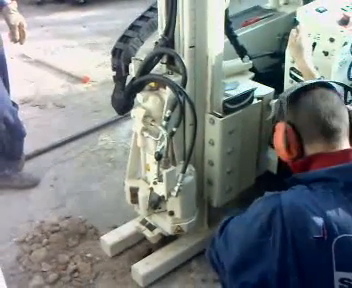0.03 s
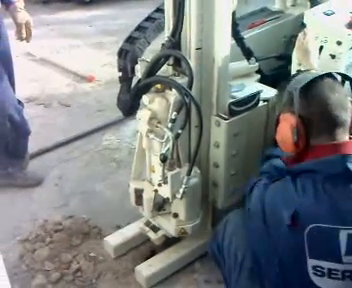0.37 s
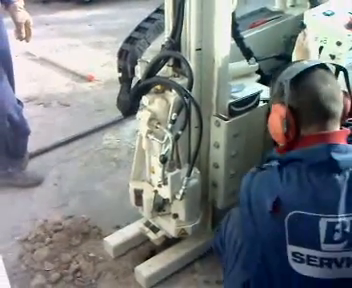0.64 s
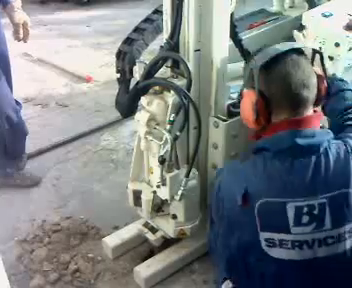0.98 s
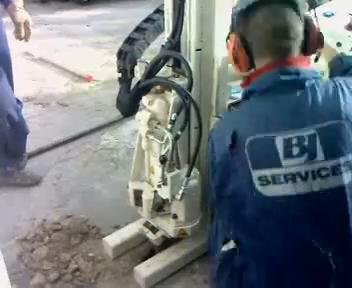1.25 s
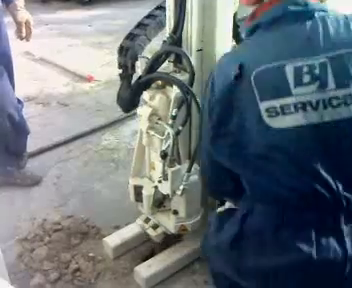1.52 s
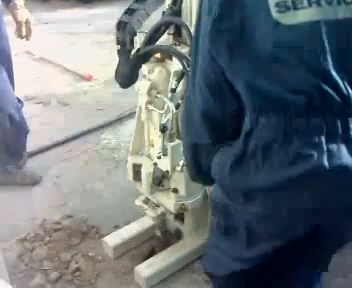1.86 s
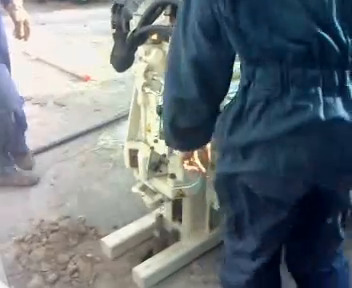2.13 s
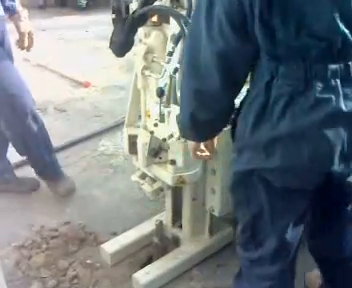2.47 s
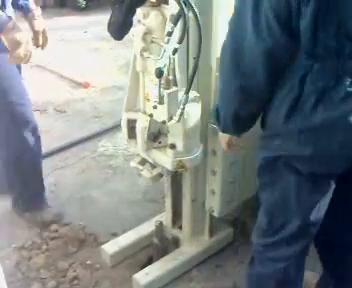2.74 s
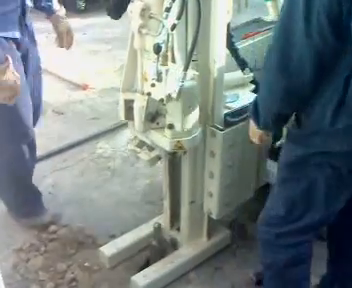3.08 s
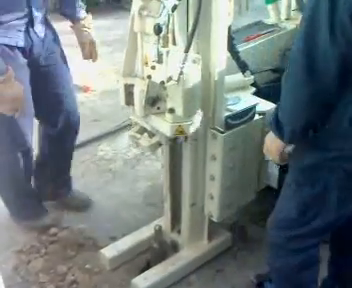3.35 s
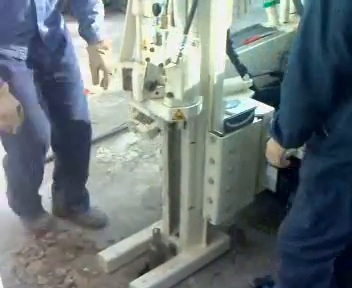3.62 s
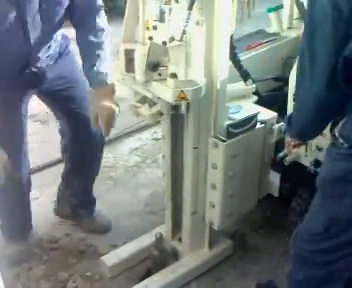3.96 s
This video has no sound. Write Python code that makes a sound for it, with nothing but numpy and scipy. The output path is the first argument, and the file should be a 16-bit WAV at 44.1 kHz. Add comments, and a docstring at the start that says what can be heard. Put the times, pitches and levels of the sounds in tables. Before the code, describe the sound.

A hydraulic hammer pounds a steel rod from the start, about 24 loud, clanging blows a second, close by outdoors. It slows around 1.5 seconds and stops near 1.8 after three late blows. A faint scrape and a few light metal taps follow until about 2.1. An engine drones underneath throughout, with pump whine and softly rushing oil, carrying on alone and slightly faster until 4 seconds.

```python
"""A hydraulic hammer on a small drill rig drives a steel probe rod into the ground, about 24 blows a second,
slowing slightly and stopping after three late blows. Each blow cracks, clangs in the rod and shakes the
mast; then the hammer scrapes off and the loose rod taps its guide. Behind it the three-cylinder engine
drones on with pump whine and rushing oil, a little faster once the load is off.
Outdoors in a yard, close to the rig, on a small camera that squashes the peaks."""
import sys
import numpy as np
from scipy import signal
from scipy.fft import rfft, irfft, next_fast_len
from scipy.io import wavfile
from scipy.ndimage import uniform_filter1d, map_coordinates

SR = 44100
rng = np.random.default_rng(int(sys.argv[2]) if len(sys.argv) > 2 else 0)


def to_wav(sig):
    """Store sig (one row per channel, or 1-D mono) as 16-bit WAV at the path in sys.argv[1].

    Samples outside -1..1 are clipped; the rate is SR.
    """
    pcm = np.clip(np.atleast_2d(sig), -1, 1) * 32767
    pcm = np.round(pcm).astype(np.int16)
    wavfile.write(sys.argv[1], SR, pcm.T)  # frames by channels


N = 176400

# The hammer's blows. Each row: start in seconds, then relative levels in dB of the clang,
# of the mast and crack, and of the rod's ring.
BLOWS = [(0.0004, -10, -13.5, -20), (0.0329, -11, -11.5, -21.5), (0.0744, -7, -12, -22),
         (0.1149, -9, -11, -10), (0.155, -4.5, -12.5, -22), (0.195, -8.5, -12.5, -20.5),
         (0.2358, -4.5, -17, -20.5), (0.2749, -5.5, -15, -11), (0.3169, -6, -14, -28),
         (0.3583, -2, -14.5, -14.5), (0.3953, -8, -13, -21), (0.4391, -5.5, -15, -12.5),
         (0.4799, -3, -13, -20.5), (0.5211, -2.5, -12, -20.5), (0.5608, -4, -12.5, -21),
         (0.6017, 0, -13.5, -28), (0.6425, -4, -13, -21), (0.6848, -2, -12.5, -5.5),
         (0.7255, -2.5, -13.5, -17), (0.7667, -5, -11.5, -23), (0.8072, -3, -12, -20),
         (0.85, -2.5, -13, -24), (0.892, -3, -13, -13), (0.9321, -0.5, -13, -15), (0.9737, -1.5, -11.5, -5),
         (1.0171, -3.5, -12, -22), (1.058, -0.5, -13, -14.5), (1.1017, -1.5, -10.5, -22),
         (1.1438, -4.5, -11, -18), (1.1865, 0.5, -13, -5.5), (1.2294, -0.5, -9.5, -23.5),
         (1.273, -3, -12, -5.5), (1.3172, -0.5, -10.5, -7), (1.361, -2, -11, -6),
         (1.4059, -3.5, -12, -17.5), (1.4496, 0, -12.5, -6), (1.496, 1, -13.5, -16.5),
         (1.5604, -4.5, -13.5, -14.5), (1.6474, -3, -17, -19), (1.7486, -6.5, -15, -9)]
# Modes of the steel rod. Each row: pitch in Hz, relative level in dB, seconds to fall 60 dB.
ROD_MODES = [(2080, -11, .05), (4300, -7, .04), (4400, -7, .035), (5340, -2, .03), (5535, 0, .03),
             (5740, -11, .03), (6400, -16, .03)]
# Spectrum of steel on steel at the rod head. Each row: frequency in Hz, relative level in dB.
CONTACT_SPECTRUM = [(300, -24.5), (1000, -18), (1600, 1), (2100, 6), (2700, -10), (3700, -8.5),
                    (4400, -5.5), (5200, -11), (7500, -16.5)]


def amp(db):
    """Decibels to gain."""
    return 10 ** (np.asarray(db) / 20)


def unit(x):
    """Scaled to rms 1."""
    return x / np.sqrt(np.mean(x ** 2) + 1e-20)


def curve(rows):
    """(s, value) points as one value per sample."""
    return np.interp(np.arange(N) / SR, *np.transpose(rows))


def wobble(rate):
    """A smooth random curve, rate knots a second."""
    return map_coordinates(rng.standard_normal(int(N * rate / SR) + 4), [np.arange(N) * rate / SR])


def rise(t, attack_s):
    """An onset that climbs from 0 towards 1."""
    return 1 - np.exp(-t / attack_s)


def fade(t, t60, hold_s=0):
    """Full level for hold_s, then down 60 dB every t60 seconds."""
    return amp(-60 * np.maximum(t - hold_s, 0) / t60)


def swell(t, at_s, width_s):
    """A bell curve that peaks at at_s."""
    return np.exp(-.5 * ((t - at_s) / width_s) ** 2)


def coloured(x, points):
    """x through a spectrum of (Hz, dB) points on a log axis."""
    n = x.shape[-1]
    size = next_fast_len(n + 2048)
    hz, db = np.transpose(sorted(map(tuple, points)))
    gain = amp(np.interp(np.log(np.fft.rfftfreq(size, 1 / SR) + 1), np.log(hz + 1), db))
    return irfft(rfft(x, size) * gain, size)[..., :n]


def band(hz, width):
    """Spectrum of one broad resonance, 30 dB down a factor of 1 + width either side of hz."""
    skirt = [(1 + width / 4, 0), (1 + width, -30), (1 + 3 * width, -70)]
    return [(hz / ratio, db) for ratio, db in skirt] + [(hz * ratio, db) for ratio, db in skirt]


def blend(a, b, share):
    """Two unrelated signals mixed by power, share of it from a."""
    return np.sqrt(share) * a + np.sqrt(1 - share) * b


def valve():
    """Oil rushes through a valve in uneven surges."""
    # The narrow band of the rush. Each row: frequency in Hz, relative level in dB.
    rush_spectrum = [(1200, -40.5), (1480, -9.5), (1600, 3), (1670, -0.5), (1760, -15.5), (2000, -41.5)]
    surges = amp(1.5 * wobble(rate=22))
    return amp(-41) * unit(surges * coloured(rng.standard_normal(N), rush_spectrum))


def cyclic_noise(cycles, cycle_hz, spectrum):
    """Machine noise: half its power repeats with every engine cycle, half is fresh."""
    size = int(SR / cycle_hz.mean())
    position = (cycles % 1 * size).astype(int) % size
    repeated = rng.standard_normal(size)[position]
    return unit(coloured(blend(repeated, rng.standard_normal(N), share=.5), spectrum))


def clatter(cycles, cycle_hz):
    """The engine's gears and valves clatter round with each cycle."""
    # Colour of the clatter. Each row: frequency in Hz, relative level in dB.
    spectrum = [(30, -17.5), (60, -2), (120, 7.5), (260, 5), (400, 2), (600, -2), (900, -2.5), (1200, -2.5),
                (1450, 0), (1800, -1.5), (2050, -2.5), (2250, -9.5), (2650, -4.5), (3200, -4), (3500, -8),
                (4200, -11), (4700, -9), (5200, -14), (6000, -13.5), (7200, -18.5), (7700, -29),
                (8300, -49.5)]
    # Its loudness. Each row: time in seconds, level in dB.
    levels = [(0, -29), (1.9, -31.5), (2.5, -33), (3.2, -33), (4, -32.5)]
    return amp(curve(levels)) * cyclic_noise(cycles, cycle_hz, spectrum)


def knock(cycles, cycle_hz):
    """Combustion knocks in three cylinders in turn, each with its own strength."""
    # Colour of the knock. Each row: frequency in Hz, relative level in dB.
    spectrum = [(300, -24), (600, -9), (870, 0), (1030, -1), (1200, -16), (3000, -26)]
    cylinders, cylinder_db = 3, np.array([-7, 0, -10])
    firings = cycles * cylinders
    since_firing_s = firings % 1 / (cycle_hz * cylinders)
    strength = amp(cylinder_db[np.floor(firings).astype(int) % cylinders])
    pulses = uniform_filter1d(strength * fade(since_firing_s, t60=.024), size=60)
    return amp(-39.5) * unit(pulses * cyclic_noise(cycles, cycle_hz, spectrum))


def drone(cycles):
    """Exhaust puffs, pump whine and fan, all tied to the crankshaft."""
    # Exhaust, block and main pump tones. Each row: multiple of the cycle rate, relative level in dB.
    engine_tones = [(2, -48.5), (3, -21), (6, -19), (9, -24), (12, -29.5), (20, -31), (22, -51), (32, -52),
                    (34, -44.5), (38, -56), (39, -48.5)]
    # The pump's upper whine. Each row: multiple of the cycle rate, relative level in dB.
    pump_tones = [(40, -40.5), (80, -49.5), (98, -54), (102, -55), (110, -57), (127, -55)]
    # Swell of the engine tones and fan. Each row: time in seconds, gain in dB.
    engine_swell = [(0, -0.5), (.6, -1), (1.2, -0.5), (1.65, -1), (1.87, 0.5), (2.2, .5), (3, 0.5),
                    (4, -0.1)]
    # Swell of the upper whine. Each row: time in seconds, gain in dB.
    pump_swell = [(0, -3.5), (2.3, -5.5), (2.75, -1), (3.1, 2.5), (3.6, 3), (4, 4.5)]
    fan_order, fan_db, waver_db = 8.67, -35.5, .4

    def tones(rows):
        return sum(-amp(db + waver_db * wobble(rate=12)) * np.cos(2 * np.pi * round(order) * cycles)
                   for order, db in rows)

    fan = amp(fan_db) * np.sin(2 * np.pi * fan_order * cycles)
    engine = amp(curve(engine_swell)) * (tones(engine_tones) + fan)
    pump = amp(curve(pump_swell)) * tones(pump_tones)
    return np.sqrt(2) * (engine + pump)


def scrape():
    """A short scrape of steel as the hammer slides off the rod head."""
    slide = swell(np.arange(N) / SR, at_s=1.88, width_s=.025)
    return amp(-37) * slide * unit(coloured(rng.standard_normal(N), CONTACT_SPECTRUM))


def taps():
    """The loosened rod taps its guide, lightly ringing its modes."""
    # The contacts. Each row: start in seconds, gain in dB.
    contacts = [(1.828, -40), (1.895, -33), (1.912, -39), (2.098, -41)]
    out, t = np.zeros(N), np.arange(SR // 8) / SR
    for start, tap_db in contacts:
        ring = sum(amp(db) * fade(t, t60) * np.sin(2 * np.pi * (hz * t + rng.random()))
                   for hz, db, t60 in ROD_MODES)
        out[round(start * SR):][:len(t)] += amp(tap_db) * rise(t, attack_s=.002) * ring
    return out


def mode(t, hz, db, t60, hold_s=0):
    """One struck mode, one row per blow, a little different in level and pitch each time."""
    scatter, detune = rng.standard_normal((len(BLOWS), 2)).T[:, :, None]
    tone = np.sin(2 * np.pi * hz * (1 + .003 * detune) * t)
    return amp(db + 1.5 * scatter) * fade(t, t60, hold_s) * tone


def dense_modes(t, spectrum):
    """Crowded steel modes, one row per blow: a pattern that drifts as the rod sinks, plus fresh rattle."""
    pattern, rows = rng.standard_normal(len(t)), []
    for drift, fresh in rng.standard_normal((len(BLOWS), 2, len(t))):
        pattern = blend(pattern, drift, share=.96)
        rows.append(blend(pattern, fresh, share=.68))
    return unit(coloured(np.array(rows), spectrum))


def mast_shake(t, starts):
    """Each blow rattles and rings the mast and clanks the frame; the rattle echoes round the yard."""
    # The rattle's low and upper range. Each row: frequency in Hz, relative level in dB.
    low_spectrum = [(60, -29.5), (190, -14), (255, 3), (330, -10), (420, -11)]
    upper_spectrum = [(520, -6.5), (620, -5), (750, -4), (950, -6.5), (1200, -4), (1600, -0.5), (2050, -5),
                      (2900, -9), (3500, -6), (4080, -9), (4450, -7.5), (5400, -7), (6000, -11),
                      (7300, -15), (8500, -16.5), (10000, -38)]
    # Mast modes, each loudest as the carriage passes its spot.
    # Each row: pitch in Hz, relative level in dB, seconds to fall 60 dB, loudest moment in seconds.
    mast_modes = [(255, -7, .2, .0), (748, -7, .13, .4), (1064, -10, .13, 1.05), (1210, -6, .13, .85),
                  (1355, -6, .13, .75), (1530, -6, .13, .3), (1575, -6, .13, 1.4), (1745, -8, .12, 1.3),
                  (2085, -5, .09, 1.2), (2330, -8, .08, .7), (3530, -11, .08, 1.2), (4340, -1, .07, .75),
                  (4420, 0, .06, .45)]
    # Hollow clanks that come and go as the rod sinks.
    # Each row: centre in Hz, relative level in dB, loudest moment and spread around it in seconds.
    frame_clanks = [(770, -5, .53, 0.051), (1260, -3, 0.78, .22), (2185, -2, 0.61, 0.2),
                    (2020, -4.5, 1.7, 0.077)]
    direct = amp(1) * fade(t, t60=.14)
    yard_echo = amp(-9.5) * fade(t, t60=.55)
    rattle = np.hypot(direct, yard_echo) * dense_modes(t, list(low_spectrum) + list(upper_spectrum))
    body = amp(-3) * sum(swell(starts, at_s, width_s=.4) * mode(t, hz, db, t60)
                         for hz, db, t60, at_s in mast_modes)
    clanks = sum(swell(starts, at_s, width_s) * amp(db) * dense_modes(t, band(hz, width=.3))
                 for hz, db, at_s, width_s in frame_clanks)
    return rise(t, attack_s=.0026) * (rattle + body + fade(t, t60=.13) * clanks)


def rod_ring(t):
    """The struck rod's modes sound briefly and leave a faint after-ring."""
    ring = sum(mode(t, hz, db, t60, hold_s=.007) + mode(t, hz, db - 24, t60=.4)
               for hz, db, t60 in ROD_MODES)
    return amp(-4) * rise(t, attack_s=.003) * ring


def rod_clang(t):
    """A bright clang, held while the rod chatters."""
    # Colour of the clang. Each row: frequency in Hz, relative level in dB.
    spectrum = [(300, -35), (700, -9.5), (1500, -9), (2300, -4.5), (2800, -8.5), (3500, -3.5), (4050, -4.5),
                (4380, 0.5), (4750, -0.5), (5150, 2), (5500, 4.5), (6000, -6.5), (7000, -11), (7700, -16)]
    envelope = rise(t, attack_s=.00037) * fade(t, t60=.024, hold_s=.006)
    return amp(-7.5) * envelope * dense_modes(t, spectrum)


def piston_crack(t):
    """The piston lands with a crack, one half-sine burst long."""
    crack_s = .0024
    burst = np.sin(np.pi * np.minimum(t / crack_s, 1))
    return amp(6.5) * burst * dense_modes(t, CONTACT_SPECTRUM)


def hammer():
    """The run of blows: each cracks, clangs, shakes the mast and rings the rod."""
    t = np.arange(int(.36 * SR)) / SR
    starts, clang_db, mast_db, ring_db = np.transpose(BLOWS)[:, :, None]
    crack = amp(mast_db) * piston_crack(t)
    clang = amp(clang_db) * rod_clang(t)
    mast = amp(mast_db) * mast_shake(t, starts)
    ring = amp(ring_db) * rod_ring(t)
    out = np.zeros(N + len(t))
    for start, blow in zip(starts[:, 0], crack + clang + mast + ring):
        out[round(start * SR):][:len(t)] += blow
    return out[:N]


def scene():
    """Engine and hammer at one spot close to the microphone, in mono."""
    # The pump's main whine, which gives the engine speed. Each row: time in seconds, pitch in Hz.
    whine_pitch = [(0.0, 503.3), (1.38, 502.4), (1.59, 513.4), (1.75, 505.6), (2.16, 510.6), (4.0, 508.5)]
    whine_order, speed_waver, first_firing_s = 20, .0012, .0105
    cycle_hz = curve(whine_pitch) / whine_order * (1 + speed_waver * wobble(rate=14))
    cycles = np.cumsum(cycle_hz) / SR - first_firing_s * cycle_hz[0]
    engine = drone(cycles) + clatter(cycles, cycle_hz) + knock(cycles, cycle_hz)
    return (engine + valve() + hammer() + scrape() + taps())[None]


def record(dry):
    """The camera drops the deep bass and rounds off the peaks; the high treble is cut away."""
    # Steep treble cut near 7.7 kHz, with a faint band of fizz around 8.4 kHz.
    # Each row: frequency in Hz, gain in dB.
    treble_rolloff = [(20, -3), (7300, 0), (7650, -6.5), (7850, -28.5), (8100, -38), (8400, -14),
                      (8900, -25)]
    low_cut_hz, top_hz = 30, 8969
    ceiling, hardness = .74, 4
    thinned = signal.sosfilt(signal.butter(2, low_cut_hz, "highpass", fs=SR, output="sos"), dry)
    squashed = thinned / (1 + np.abs(thinned / ceiling) ** hardness) ** (1 / hardness)
    size = next_fast_len(N + 8192)
    passband = np.fft.rfftfreq(size, 1 / SR) < top_hz
    return irfft(rfft(coloured(squashed, treble_rolloff), size) * passband, size)[..., :N]


dry = scene()
out = record(dry)
to_wav(out)
```